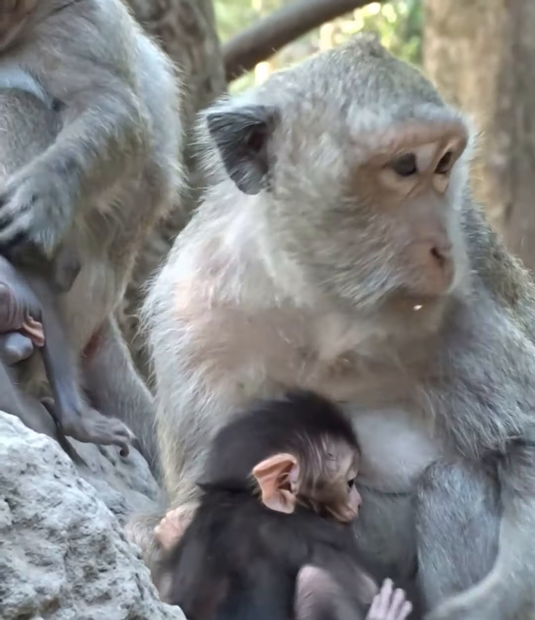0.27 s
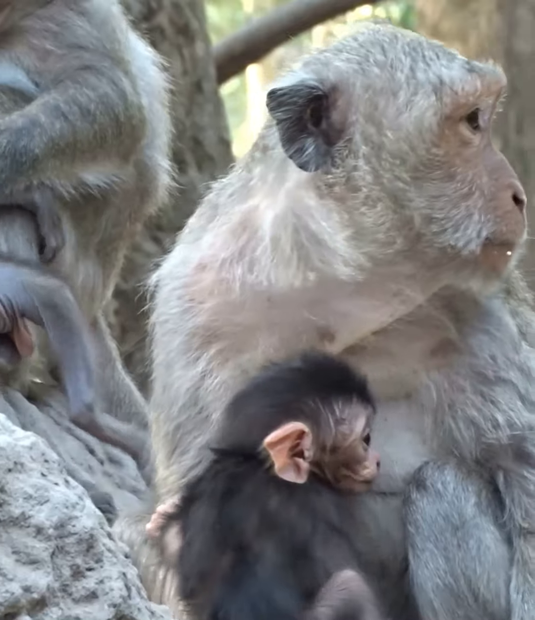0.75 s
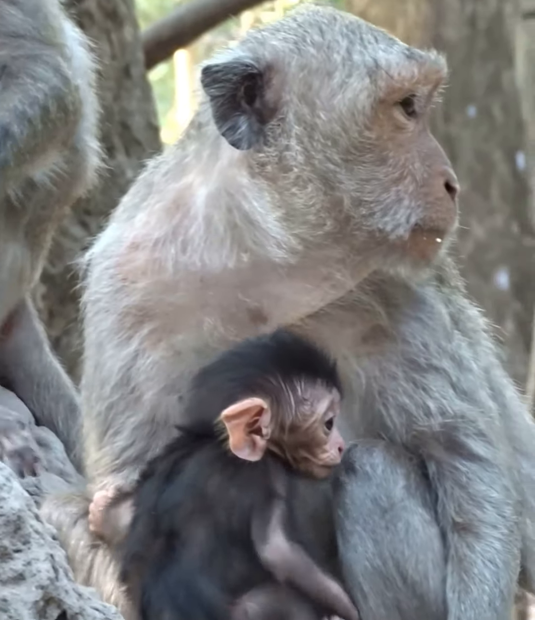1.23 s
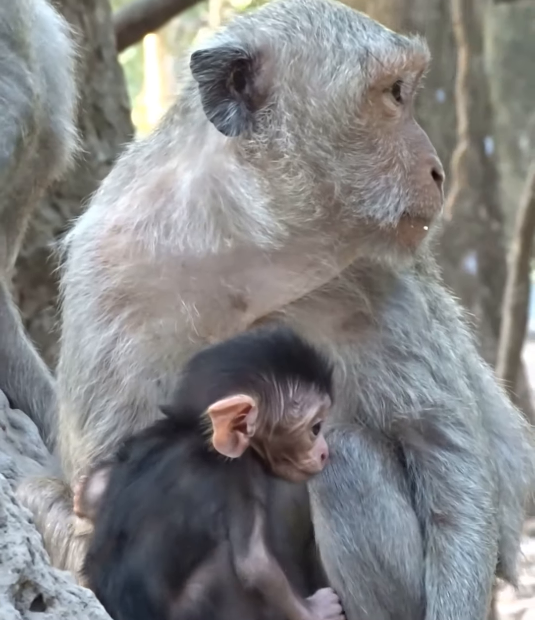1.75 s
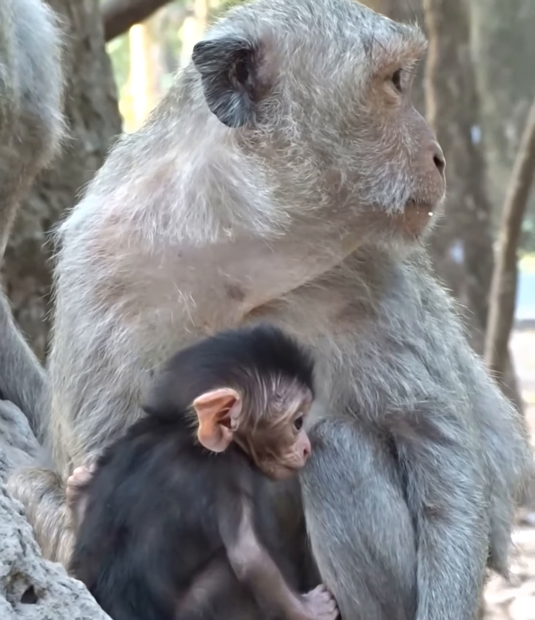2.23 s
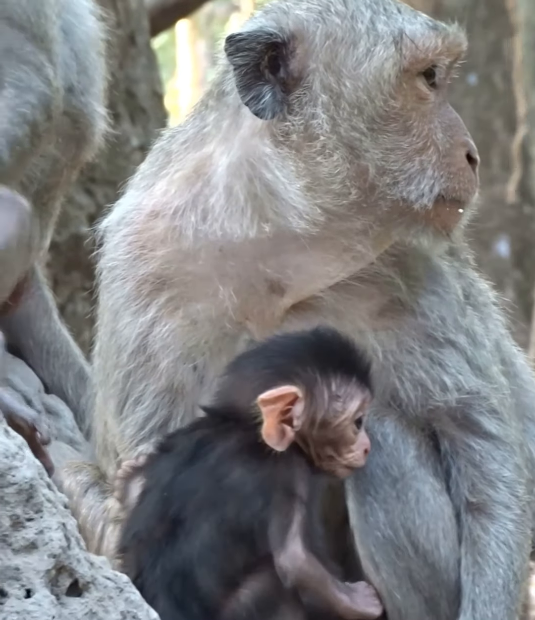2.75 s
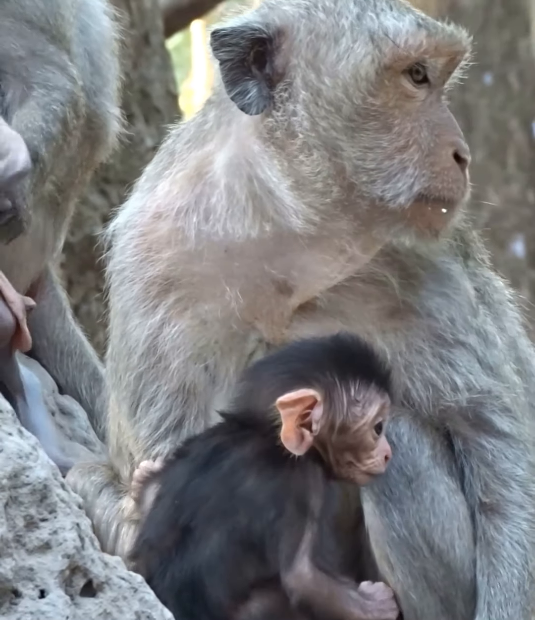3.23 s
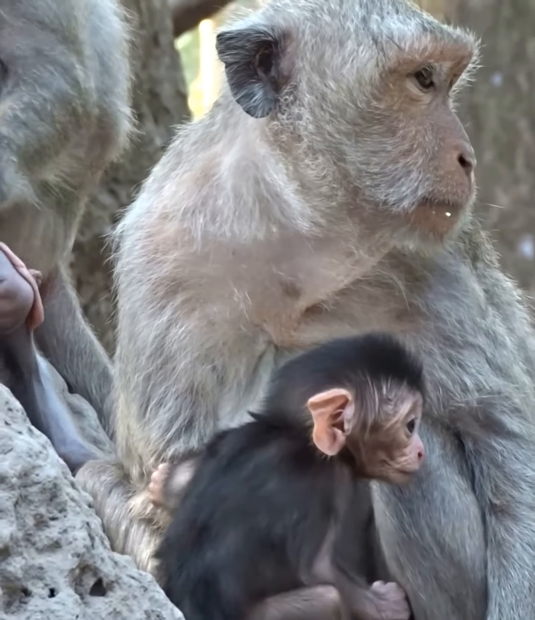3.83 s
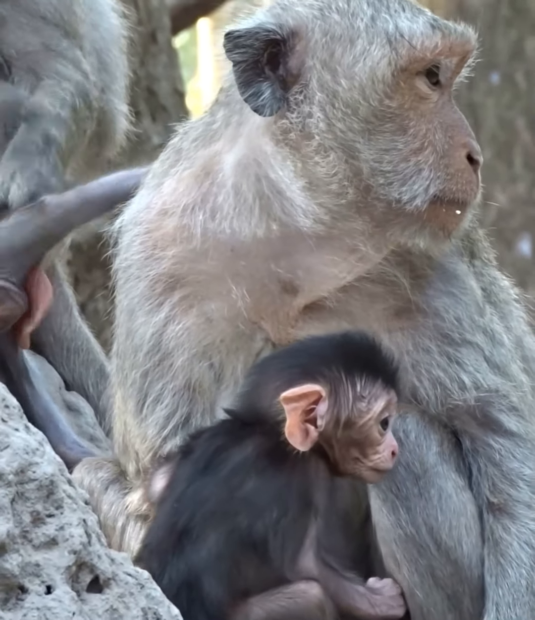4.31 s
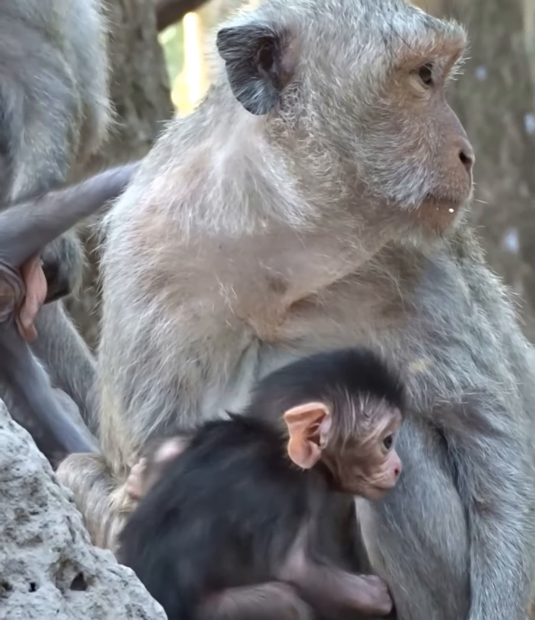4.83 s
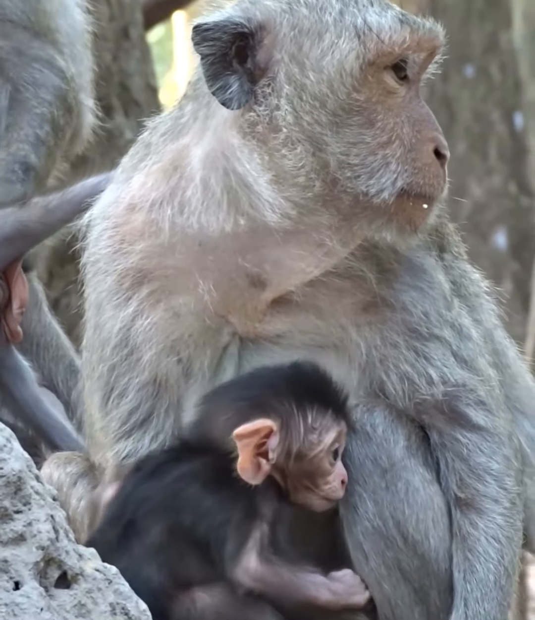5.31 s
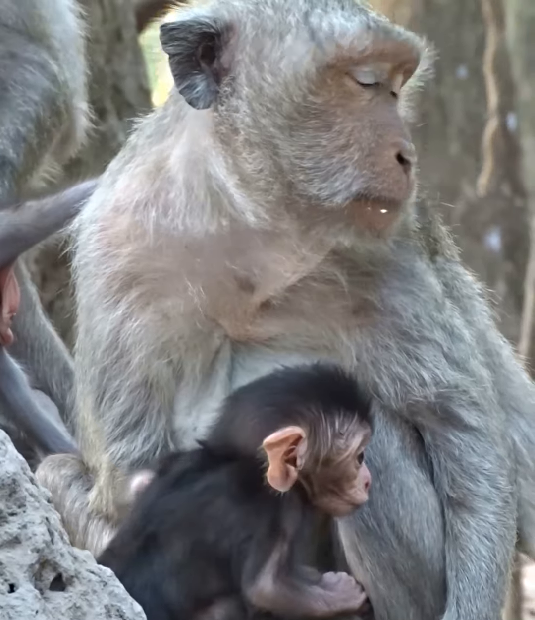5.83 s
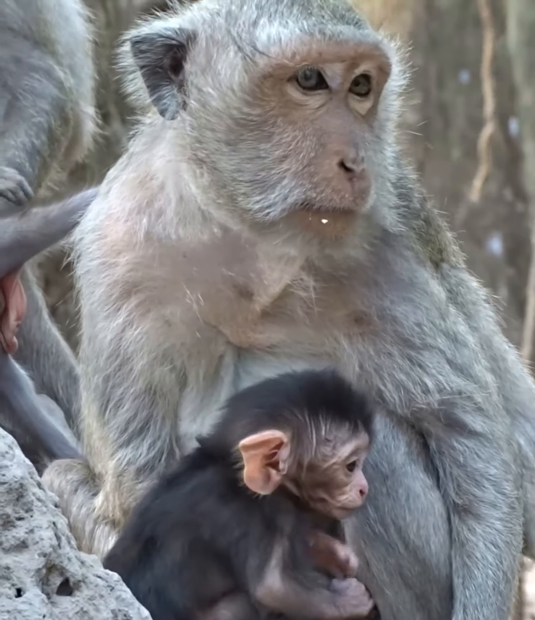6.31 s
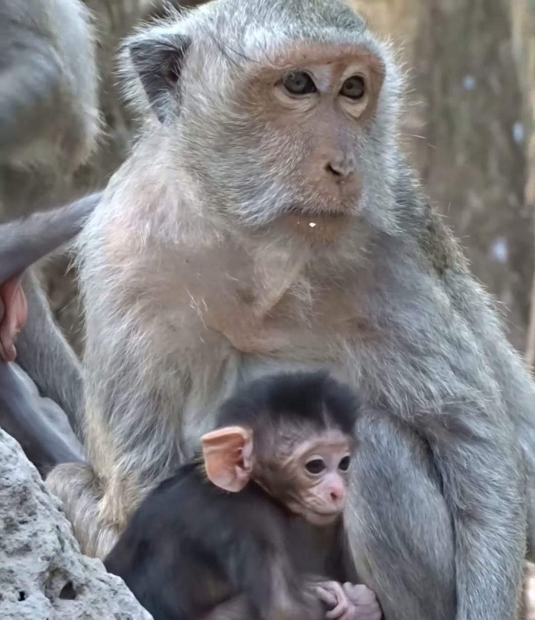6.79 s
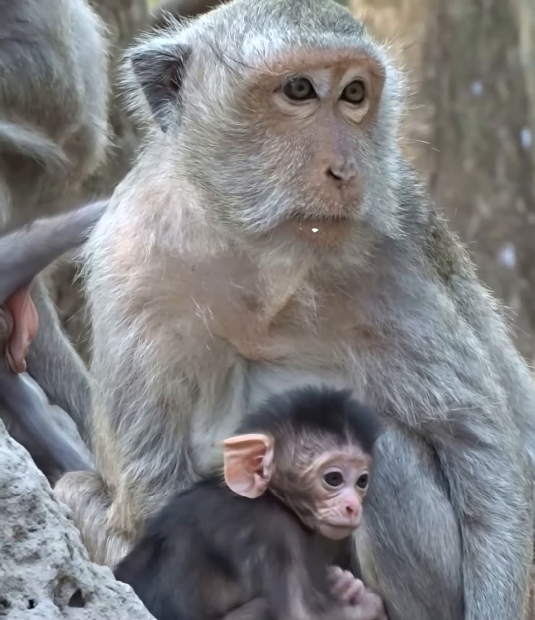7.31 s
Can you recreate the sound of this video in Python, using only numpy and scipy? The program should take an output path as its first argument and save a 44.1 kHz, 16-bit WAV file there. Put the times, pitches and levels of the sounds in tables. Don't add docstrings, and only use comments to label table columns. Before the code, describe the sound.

An infant monkey squeaks and screams piercingly close by, over soft leaf rustle, twig snaps, a faint distant whine, two coos and low traffic hum.

```python
import sys
import numpy as np
from scipy import signal
from scipy.fft import rfft, irfft, next_fast_len
from scipy.io import wavfile
from scipy.ndimage import uniform_filter1d

SR = 44100
rng = np.random.default_rng(int(sys.argv[2]) if len(sys.argv) > 2 else 0)


def to_wav(sig):
    pcm = np.clip(np.atleast_2d(sig), -1, 1) * 32767
    pcm = np.round(pcm).astype(np.int16)
    wavfile.write(sys.argv[1], SR, pcm.T)


def gain_from_db(level_db):
    decades = np.asarray(level_db, float) / 20
    return 10 ** decades


N = 332945
TIME = np.arange(N) / SR

# (time [s], pitch [Hz], level [dB])
PEEP = [(2.285, 7550, -46), (2.3, 7550, -33), (2.328, 7550, -29), (2.336, 8120, -37), (2.37, 8170, -36),
        (2.405, 8000, -38.5), (2.425, 7400, -35), (2.445, 6850, -41), (2.47, 6850, -50)]
# (time [s], pitch [Hz], level [dB])
WHIMPER = [
    (3.232, 6150, -52),
    (3.262, 6300, -36),
    (3.318, 6345, -36),
    (3.324, 6350, -44),
]
# (time [s], pitch [Hz], level [dB])
SQUEAK = [(3.324, 6680, -22), (3.373, 6830, -18), (3.391, 7150, -12), (3.447, 7160, -11.8),
          (3.46, 6900, -12), (3.468, 6650, -17), (3.475, 6150, -27), (3.484, 4700, -30), (3.49, 4400, -42)]
# (time [s], pitch [Hz], level [dB])
SCREAM = [(3.758, 6320, -50.5), (3.775, 7520, -19.5), (3.787, 8200, -15), (3.8, 8460, -16.5),
          (3.9, 8460, -16.5), (3.996, 8090, -17), (4.03, 7180, -13.5), (4.083, 7110, -22),
          (4.092, 6600, -32)]
# (start [s], start pitch [Hz], end pitch [Hz], level [dB], roughness [0-1])
STROKES = [
    (3.8, 5000, 4700, -27, 1),
    (3.85, 4500, 5050, -22.5, .45),
    (3.885, 5100, 4600, -26, 1),
    (3.918, 4600, 5300, -20, .25),
    (3.943, 5400, 5300, -29, .5),
    (3.957, 4930, 4870, -18.5, .08),
]
# (time [s], pitch [Hz], level [dB])
CHIRP = [(4.524, 6020, -48.5), (4.536, 6400, -43), (4.543, 7400, -33.5), (4.566, 7160, -37),
         (4.572, 6830, -39), (4.597, 6730, -41), (4.603, 5850, -46), (4.612, 5640, -41), (4.65, 5630, -48)]
# (frequency [Hz], level [dB])
TOWARD_TRUNKS = [(3500, -4), (5000, -8), (7000, -5.5), (9000, 4), (12000, -6.5), (14000, 3)]
MOUTH_TOP_HZ = 13800
OCTAVE_GROWS = 0.36
WHISTLE_FLUTTER_DB = .8

CHAOS_START_S, CHAOS_END_S, CHAOS_FADE_S, CHAOS_ROUGH = 3.796, 4.015, .012, 0.97
WARBLE_PERIOD_S, WARBLE_DEPTH_HZ, WARBLE_DB = .04, 90, -.5
STROKES_END_S, STROKE_EDGE_DB = 4.003, -5
PULL, PULL_CENTRE_HZ, SHARED_ROUGH = 0.493, 4730, 0.52
MIXING_DB, MIXING_ROUGH = (-14, -13, -20, -15), .35

# (time [s], pitch [Hz], level [dB])
MURMUR = [
    (5.6, 769, -50),
    (5.63, 801, -46),
    (5.7, 840, -45),
    (5.775, 862, -42),
]
# (time [s], pitch [Hz], level [dB])
COOS = [
    [(5.765, 870, -52), (5.78, 949, -45), (5.795, 1027, -40), (5.826, 1026, -36), (5.9, 1025, -33.5),
     (5.925, 1015, -38), (5.945, 960, -45), (5.96, 918, -47), (5.99, 900, -53)],
    [(6.955, 856, -39), (6.99, 975, -35.5), (7.02, 980, -33.5), (7.05, 1010, -31.5), (7.095, 990, -35),
     (7.13, 950, -34), (7.16, 920, -35.5), (7.19, 905, -38), (7.235, 915, -46)],
]
# (frequency [Hz], level [dB])
COO_THROATS = [
    [(900, -38), (2050, -14), (3080, -10), (3400, -12), (3850, -9), (4100, 1), (4250, -22), (5130, -13),
     (6150, -11.5), (7180, -12), (8200, -22), (9230, -16), (11000, -39)],
    [(900, -24), (2000, -13), (3000, 0), (3600, -6), (4000, -4), (5000, -15), (6000, -14), (7000, -10),
     (8000, -14), (8900, -7), (11000, -40)],
]
# (time [s], pitch [Hz], level [dB])
WHINE = [(3.33, 886, -46.5), (3.5, 883, -55), (3.62, 881, -47), (3.8, 879, -51), (4.5, 870, -51.5),
         (5.0, 854.3, -50), (5.3, 852.5, -50), (5.62, 846, -63)]
# (frequency [Hz], level [dB])
WHINE_THROAT = [(700, -15), (900, -20), (1750, -12.5), (2600, -6), (3500, 0.5), (4400, -12), (5300, 2.5),
                (7000, -11.5), (9000, -8)]
SLACK_DULLS = .22

# (start [s], length [s], top pitch [Hz], level [dB])
UPSWEEPS = [
    (0, 0.026, 7000, -44.5),
    (.3, 0.093, 7120, -48.5),
    (0.872, 0.11, 7240, -50),
    (1.454, 0.1, 7320, -51),
    (2.118, .16, 7240, -51.5),
    (2.846, 0.1, 7260, -48),
    (6.411, 0.13, 7260, -48.5),
]
# (start [s], length [s], top pitch [Hz], level [dB])
DOWNSWEEPS = [
    (.19, .1, 6490, -50.5),
    (2.03, .086, 6390, -48),
]
# (start [s], pitch [Hz], level [dB])
PIPS = [
    (0, 2850, -56),
    (.39, 2840, -54.5),
    (.83, 3400, -61.5),
    (1.3, 2860, -60),
    (1.76, 2850, -60),
    (2.18, 2870, -57),
]
# (start [s], length [s], pitch [Hz], level [dB])
DRONES = [(.97, 0.47, 2377, -61.5), (0.956, .05, 7000, -57), (1.72, 0.33, 3290, -68),
          (2.1, 0.19, 2385, -63), (2.096, 0.36, 3270, -66.5), (2.28, 0.12, 1900, -66)]
# (start [s], length [s], start
# pitch [Hz], end pitch [Hz], level [dB])
SLIPS = [
    (3.408, .014, 4950, 4850, -40),
    (3.429, 0.016, 4800, 4800, -33),
    (2.641, .009, 7500, 7050, -41),
    (4.462, .042, 3900, 5500, -44),
]
# (start [s], length [s], start pitch [Hz], end pitch [Hz], level [dB])
SCOOPS = [
    (4.83, 0.12, 2140, 2500, -57),
    (5.21, .05, 2160, 2420, -49.5),
    (5.31, 0.066, 2536, 2570, -53),
    (5.38, .025, 2500, 2250, -53),
]
BIRD_LOW_HZ, BIRD_ECHO_DB = 4600, -0.5
PIP_S, PIP_SAG_HZ, PIP_ECHO_DB = 0.089, 150, -5
DRONE_ECHO_DB, SLIP_ECHO_DB, SCOOP_ECHO_DB = -1.5, -14, -8
FAR_LOSS = .36
BRIGHT_DB_PER_KHZ = 1

# (peak time [s], level [dB], time to rise 20 dB [s], time to fall 20 dB [s])
RUSTLE = [(0, -55.5, .01, 0.07), (.18, -59, -1.5, 0.5), (.86, -61, -1.7, 1), (1.16, -65, -4, .6),
          (1.54, -54, -0.4, 0.33), (1.65, -58.5, -0.2, 0), (2.14, -58, -0.17, .5), (2.28, -54, -0.2, -1),
          (2.371, -50.5, -0.03, -0.83), (2.779, -45.5, 0.1, 0.03), (3.15, -52.5, 0.74, 0.6),
          (3.176, -46.5, -0.01, 0.17), (2.9, -63, 0.3, -0.7), (3.9, -54, 2, 0), (3.99, -44.5, .06, 0.24),
          (4.299, -45, 0.06, 0.03), (4.31, -51.5, 0.3, 1.5), (5.05, -50.5, 0.83, 0.45), (5.58, -53, 0.4, 2),
          (6.07, -52.5, 1.5, -0.2), (6.16, -42.5, 0.1, 0.21), (6.22, -45, 0.5, -0.04),
          (6.54, -48.5, 0.24, 0.22), (6.68, -56, 0.8, -0.3), (6.72, -52.5, .03, 0.34),
          (6.93, -45.5, 0.008, 0.46), (6.91, -60, 0.2, 0.5), (7.423, -47.5, 0.12, 1)]
# (frequency [Hz], level [dB per Hz])
LEAVES = [(410, -29), (700, -7), (1430, -9), (1610, -8.5), (2180, -8), (2540, -2.5), (3660, -3.5),
          (4070, -8), (4400, -5), (7600, 0.5), (8330, -1), (15800, -20)]
# (time [s], peak level [dB], pitch [Hz])
TICKS = [(1.541, -38, 7230), (2.3694, -36, 7640), (2.5674, -36, 10500), (2.745, -27, 7000),
         (2.832, -33, 6900), (2.6453, -31, 7000), (3.176, -17, 2680), (3.2198, -27, 6310),
         (4.286, -21.5, 8500), (5.579, -23, 3400), (6.549, -22.5, 7380), (6.5844, -36, 7960),
         (6.672, -24, 7400), (6.721, -36, 7300), (6.6894, -36, 7600), (6.781, -37, 6730),
         (6.8102, -27, 7040), (6.9294, -24, 3480), (6.934, -22.5, 9000), (6.9378, -21, 7500),
         (6.9447, -26.5, 7000), (6.9534, -25, 8500), (6.9655, -28, 6500), (3.3, -26, 7000),
         (7.436, -28, 9000), (7.4255, -31, 3140), (7.483, -20.5, 7490), (7.511, -29, 7720)]
# (time [s], peak level [dB], pitch [Hz])
KNOCKS = [(1.554, -31, 1800), (1.5908, -36, 2370), (2.27, -36, 2390), (3.251, -36, 2680),
          (4.548, -29, 2800), (4.7896, -33.5, 1590), (5.323, -25, 1800), (5.5774, -29.5, 2070),
          (4.287, -33, 3300), (6.155, -26, 2470), (6.201, -24.5, 2590), (7.5444, -24.5, 2870)]
# (multiple of the pitch [ratio], level [dB])
KNOCK_MODES = [
    (.72, -8),
    (1, 0.5),
    (1.43, -10),
]
# (time [s], left minus right [dB])
TROOP_SIDE = [(0, 2.5), (2.4, 1), (3.2, -.5), (5.4, 1.5), (6.2, -3), (7.55, -4)]
TWIG_T60_S, CRACK_T60_S, KNOCK_T60_S = 0.0046, 0.02, 0.014

# (time [s], level [dB])
HUM_LEVEL = [(0, -40), (1.5, -39.5), (2.2, -39), (2.7, -38), (3.4, -36.5), (3.9, -40.5), (4.4, -37),
             (5.5, -41), (7.55, -39.5)]
# (frequency [Hz], level [dB per Hz])
RUMBLE = [(13, -43), (22, -32), (41, -4), (92, 1), (116, -0.5), (258, -15), (400, -19.5), (520, -25),
          (880, -120)]
# (frequency [Hz], level [dB per Hz])
AIR = [(120, -12.5), (200, -3), (283, -10.5), (537, -10.5), (847, -9), (1110, -14.5), (1730, -19),
       (2150, -22), (2360, -17), (2540, -19), (4310, -25), (7190, -19), (14900, -38.5), (15800, -36)]
# (time [s], level [dB])
AIR_LEVEL = [(0, -49.5), (1.5, -52.5), (2.4, -50), (3.5, -53.5), (4.25, -50.5), (7.55, -50)]
# (frequency [Hz], likeness [0-1])
ALIKE = [(60, 1), (130, 1), (290, 0.93), (640, 0.67), (1410, 0.99), (3100, 0.76), (6820, 0.95),
         (15000, 0.64)]
# (frequency [Hz], time to fall 60 dB [s])
TRUNKS = [(1000, 0.93), (4000, 1), (8000, 0.73), (14000, 0.58)]

# (frequency [Hz], phase [radians])
PORT_LEAD = [(30, 0.016), (200, 0.18), (690, 0.55), (1500, 0.95), (4650, 0.11), (15000, 0.33)]
# (frequency [Hz], left minus right [dB])
PORT_BALANCE = [(300, 0), (1300, 1.5), (4400, 1.7), (8100, 0), (15000, -2.5)]
TOP_HZ = 15850


def unit(x):
    return x / np.sqrt(np.mean(x ** 2) + 1e-20)


def along(points, hz):
    f, v = np.transpose(points)
    return np.interp(np.log(hz + 1), np.log(f + 1), v)


def curves(rows):
    s, *cols = np.transpose(rows)
    return [np.interp(TIME, s, c) for c in cols]


def gate(start, end, fade):
    return np.clip(np.minimum(TIME - start, end - TIME) / fade, 0, 1)


def wobble(rate):
    knots = rng.standard_normal(int(N * rate / SR) + 4)
    return np.interp(TIME * rate, np.arange(len(knots)), knots) * np.sqrt(1.5)


def filtered(x, response):
    m = next_fast_len(N + 8192)
    hz = np.fft.rfftfreq(m, 1 / SR)
    return irfft(rfft(x, m) * response(hz), m)[..., :N]


def panned(x, pan_db):
    return np.array([x * gain_from_db(pan_db / 2), x * gain_from_db(-pan_db / 2)])


def rush(spectrum, patchy_db):
    z = signal.stft(rng.standard_normal((2, N)), nperseg=512)[2]
    patches = uniform_filter1d(rng.standard_normal(z.shape[1:]), 6, 0)
    patches = uniform_filter1d(patches, 12, 1)
    pair = signal.istft(z * gain_from_db(patchy_db * unit(patches)), nperseg=512)[1][:, :N]

    def mid_and_side(hz):
        turn = np.arccos(np.clip(along(ALIKE, hz), -1, 1)) / 2
        return gain_from_db(along(spectrum, hz)) * [np.cos(turn), np.sin(turn)]

    mid, side = filtered(pair, mid_and_side)
    return unit(np.array([mid + side, mid - side]))


def phasor(pitch_hz, rough, spread_hz):
    unsteady_hz = pitch_hz + rough * spread_hz * wobble(900)
    turn = np.exp(2j * np.pi * np.cumsum(unsteady_hz) / SR)
    chance = (wobble(1000) + 1j * wobble(1000)) / np.sqrt(2)
    share = .65 * rough
    return turn * (np.sqrt(1 - share) + np.sqrt(share) * chance)


def background():
    hum = gain_from_db(curves(HUM_LEVEL)[0] + 0.7 * wobble(5.3)) * rush(RUMBLE, patchy_db=0.62)
    air = gain_from_db(curves(AIR_LEVEL)[0] + 5 + 1.17 * wobble(3.264)) * rush(AIR, patchy_db=1.67)
    return hum + air


def rustle():
    t = TIME[::32]
    power = np.zeros(len(t))
    for s, db, rise, fall in RUSTLE:
        before = (s - t) / max(rise, .005)
        after = (t - s) / max(fall, .005)
        power += gain_from_db(2 * db - 43.3 * np.where(t < s, before, after))
    grains = rng.standard_normal(N) * gain_from_db(2.07 * wobble(500) + 0.8 * wobble(60))
    leaves = unit(filtered(grains, lambda hz: gain_from_db(along(LEAVES, hz))))
    return panned(gain_from_db(8.5) * np.interp(TIME, t, np.sqrt(power)) * leaves, curves(TROOP_SIDE)[0])


def short_notes():
    notes = [(s, length, BIRD_LOW_HZ, hz, db, BIRD_ECHO_DB) for s, length, hz, db in UPSWEEPS]
    notes += [(s, length, hz, BIRD_LOW_HZ, db, BIRD_ECHO_DB) for s, length, hz, db in DOWNSWEEPS]
    notes += [(s, PIP_S, hz, hz - PIP_SAG_HZ, db, PIP_ECHO_DB) for s, hz, db in PIPS]
    notes += [(s, length, hz, hz, db, DRONE_ECHO_DB) for s, length, hz, db in DRONES]
    notes += [(*slip, SLIP_ECHO_DB) for slip in SLIPS]
    notes += [(*scoop, SCOOP_ECHO_DB) for scoop in SCOOPS]
    out, waver, flutter = np.zeros((2, N)), wobble(90), wobble(120)
    for start, length, start_hz, end_hz, db, echo_db in notes:
        part = slice(round(start * SR), round((start + length) * SR))
        u = np.linspace(0, 1, part.stop - part.start)
        hz = (start_hz + (end_hz - start_hz) * u) * (1 + 0.006 * waver[part])
        shape = np.sin(np.pi * u) ** .3 * gain_from_db(db + 2.5 * flutter[part])
        shape = shape * gain_from_db(BRIGHT_DB_PER_KHZ * (hz - hz.mean()) / 1000)
        note = shape * np.sin(2 * np.pi * np.cumsum(hz) / SR)
        direct_db = 1.5 - FAR_LOSS * (echo_db - SLIP_ECHO_DB)
        out[:, part] += gain_from_db([[direct_db], [echo_db + 4.0]]) * note
    return out


def ticks_and_knocks():
    out, t = np.zeros(N + SR), np.arange(SR // 20) / SR
    for s, db, hz in TICKS:
        ring = gain_from_db(-60 * t / TWIG_T60_S) * np.sin(2 * np.pi * hz * t)
        crack = uniform_filter1d(rng.standard_normal(len(t)), size=2)
        crack = 0.67 * gain_from_db(-60 * t / CRACK_T60_S) * crack
        out[round(s * SR):][:len(t)] += gain_from_db(db - 2.5) * (ring + crack)
    onset = 1 - np.exp(-t / 0.00065)
    for s, db, hz in KNOCKS:
        for multiple, level in KNOCK_MODES:
            fade = gain_from_db(db + level - 60 * t / KNOCK_T60_S)
            out[round(s * SR):][:len(t)] += fade * onset * np.sin(2 * np.pi * multiple * hz * t)
    clicks = filtered(out[:N], lambda hz: 1 / (1 + (900 / (hz + 1)) ** 4) / (1 + (hz / 13000) ** 4))
    return panned(clicks, curves(TROOP_SIDE)[0])


def whistle(rows, octave_db, rough):
    hz, db = curves(rows)
    arrow = phasor(uniform_filter1d(hz, size=150), rough, spread_hz=294)
    level = gain_from_db(db + 3 + WHISTLE_FLUTTER_DB * wobble(130)) * gate(rows[0][0], rows[-1][0], 0.0021)
    octave = gain_from_db(octave_db + OCTAVE_GROWS * (db - db.max()) + 4.0 * wobble(300)) * arrow ** 2
    return level * (arrow + octave).real


def voice(rows, throat, jitter, shimmer_db, count):
    out, part = np.zeros(N), slice(round(rows[0][0] * SR), round(rows[-1][0] * SR))
    hz, db = np.array(curves(rows))[:, part]
    shake = jitter * gain_from_db(0.608 * (db.max() - db)) * wobble(300)[part]
    cycles = np.cumsum(uniform_filter1d(hz, size=400) * (1 + shake)) / SR
    slack_db = SLACK_DULLS * (db - db.max())
    tone, power = 0, 0
    for k in range(1, count + 1):
        gain = gain_from_db(along(throat, k * hz) + k * slack_db)
        tone = tone + gain * gain_from_db(shimmer_db * wobble(50)[part]) * np.sin(2 * np.pi * k * cycles)
        power = power + gain ** 2
    out[part] = gain_from_db(db + 3) * tone / np.sqrt(power)
    return out * gate(rows[0][0], rows[-1][0], 0.006)


def troop():
    tight, relaxed = COO_THROATS
    whine = voice(WHINE, WHINE_THROAT, jitter=.023, shimmer_db=3.5, count=9)
    murmur = gain_from_db(-3.0) * voice(MURMUR, relaxed, jitter=0.009, shimmer_db=2.5, count=4)
    first = gain_from_db(1.5) * voice(COOS[0], tight, jitter=0.0016, shimmer_db=1.3, count=10)
    second = gain_from_db(-7.0) * voice(COOS[1], relaxed, jitter=0.0045, shimmer_db=3, count=10)
    return panned(whine, 1.7) + panned(murmur + first, 3.1) + panned(second, 1.5)


def passer():
    colour = [(400, -41), (620, -1), (700, 12), (800, -31), (1100, -34), (2000, -70)]  # (Hz, dB per Hz)
    return gain_from_db(-55.5) * gate(3.67, 5.7, 0.37) * rush(colour, patchy_db=-1.0)


def strokes():
    start, start_hz, end_hz, db, rough = np.transpose(STROKES)
    edges = np.append(start, STROKES_END_S)
    place = np.interp(TIME, edges, np.arange(len(edges)))
    k = np.minimum(place.astype(int), len(start) - 1)
    u = place - k
    hz = start_hz[k] + (end_hz - start_hz)[k] * u
    level_db = db[k] + STROKE_EDGE_DB * (2 * u - 1) ** 2
    return hz, level_db, uniform_filter1d(np.clip(rough, 0, 1)[k], size=300)


def scream():
    chaos = gate(CHAOS_START_S, CHAOS_END_S, CHAOS_FADE_S)
    warble = chaos * np.cos(2 * np.pi * (TIME - CHAOS_START_S) / WARBLE_PERIOD_S)
    upper_hz, upper_db = curves(SCREAM)
    lower_hz, lower_db, lower_rough = strokes()
    upper_rough = CHAOS_ROUGH * chaos * (1 - SHARED_ROUGH * (1 - lower_rough))
    both = gate(STROKES[0][0], STROKES_END_S, 0.015)
    drag = PULL * both * uniform_filter1d(lower_hz - PULL_CENTRE_HZ, size=300)
    upper_hz = uniform_filter1d(upper_hz, size=200) + drag + WARBLE_DEPTH_HZ * warble

    upper = phasor(upper_hz, upper_rough, spread_hz=329)
    purer = phasor(upper_hz, MIXING_ROUGH * upper_rough, spread_hz=330)
    lower = phasor(uniform_filter1d(lower_hz, size=100), lower_rough, spread_hz=460)
    products = [purer * lower, purer ** 2 * lower.conj(), lower ** 2, lower ** 3 * purer.conj()]
    mixing = gain_from_db(MIXING_DB) @ np.array(products)
    octave = gain_from_db(-32 + 6.8 * wobble(500)) * upper ** 2

    # (frequency [Hz], level [dB])
    breath = [(2500, -42), (4500, -6), (7000, -2.0), (9500, -4.5), (12000, -5), (16000, -21)]
    hiss = unit(filtered(rng.standard_normal(N), lambda hz: gain_from_db(along(breath, hz))))
    hiss = gain_from_db(-11.5 + 1.5 * wobble(300)) * upper_rough * hiss

    level = gain_from_db(upper_db + WARBLE_DB * warble + 1.8 * wobble(110)) * gate(SCREAM[0][0], SCREAM[-1][0], .004)
    out = level * ((upper + octave).real + hiss)
    out += gain_from_db(lower_db) * both * (lower + mixing).real
    return filtered(out, lambda hz: 1 / (1 + (3600 / (hz + 1)) ** 8))


def echo(x, alike):
    out, turn = np.zeros((2, N)), np.cumsum(wobble(8)) * 60 / SR
    for path in (np.cos(turn), np.sin(turn)):
        hz, t, z = signal.stft(rng.standard_normal((2, SR)), SR, nperseg=256)
        decay = gain_from_db(-60 * t / along(TRUNKS, hz)[:, None])
        mid, side = signal.istft(z * (1 - np.exp(-t / 0.0035)) * decay, SR, nperseg=256)[1]
        tail = np.array([mid + (1 - alike) * side, mid - (1 - alike) * side])
        tail = tail / np.linalg.norm(tail[0])
        late = np.pad(x * path, (500, 0))[None]
        out += signal.fftconvolve(late, tail, axes=1)[:, :N]
    return out


def scene():
    background_noise = background()
    litter = rustle() + ticks_and_knocks()
    notes, notes_far = short_notes()
    aside = gain_from_db(-5.5) * whistle(PEEP, octave_db=-27, rough=0.22) + whistle(CHIRP, octave_db=-21, rough=0.26)
    squeak = whistle(WHIMPER, octave_db=-30.5, rough=0) + whistle(SQUEAK, octave_db=-27, rough=0.011)
    squeak = filtered(squeak, lambda hz: 1 / (1 + (hz / MOUTH_TOP_HZ) ** 12) ** .5)
    others = troop()
    infant = squeak + scream()

    wet = gain_from_db(-9.0) * filtered(infant, lambda hz: gain_from_db(along(TOWARD_TRUNKS, hz)))
    wet += gain_from_db(-4.5) * aside + notes_far
    wet += gain_from_db(-0.5) * others.mean(axis=0) + gain_from_db(-8.5) * litter.mean(axis=0)
    direct = infant + aside + notes + gain_from_db(-1.0) * others + litter
    return direct + echo(wet, alike=0.8) + background_noise + passer()


def band_limit(x):
    return signal.sosfilt(signal.butter(12, 15920, fs=SR, output="sos"), x)


def record(dry):
    half = np.array([[.5], [-.5]])

    def port(hz):
        return gain_from_db(half * along(PORT_BALANCE, hz)) * np.exp(1j * half * along(PORT_LEAD, hz))

    ports = filtered(dry, port)
    ports = ports / (1 + np.abs(ports / .5) ** 4) ** .25
    mix = filtered(ports, lambda hz: hz < TOP_HZ)
    return band_limit(mix)


dry = scene()
out = record(dry)
to_wav(out)
```